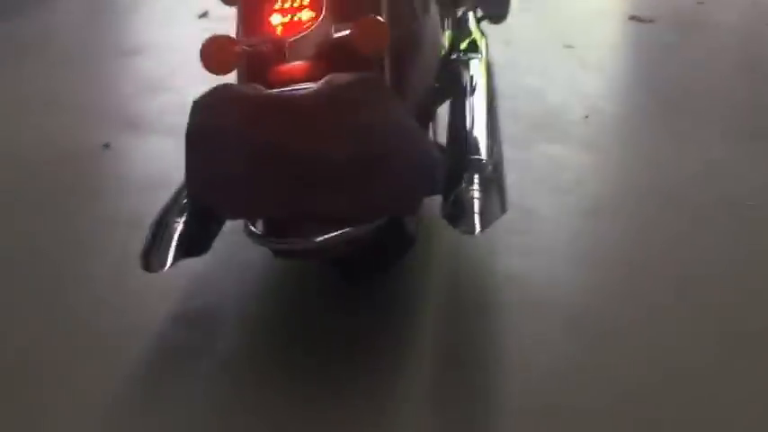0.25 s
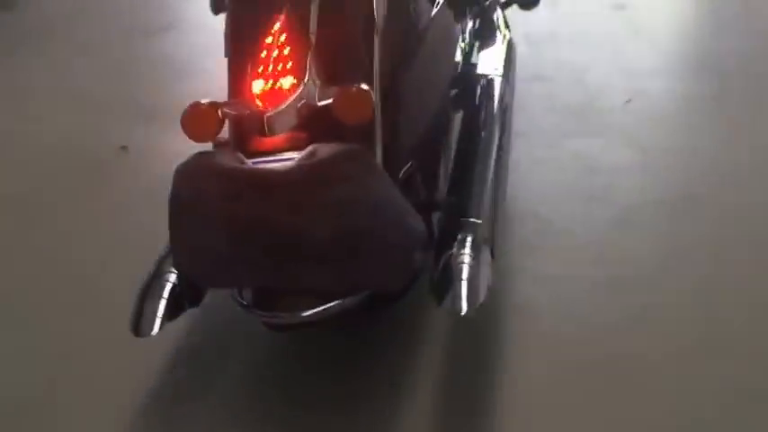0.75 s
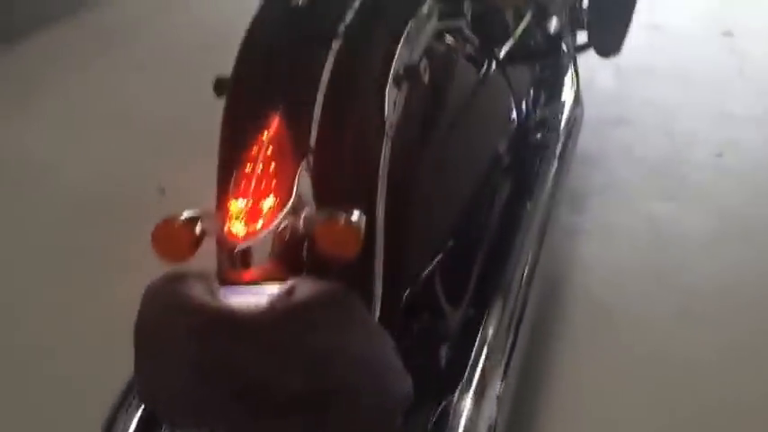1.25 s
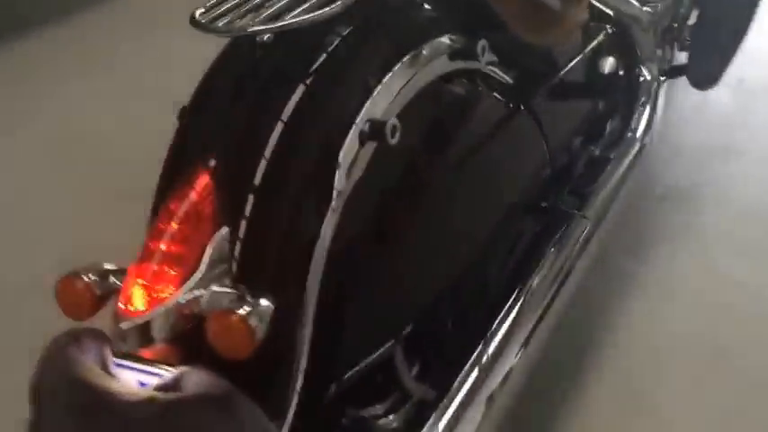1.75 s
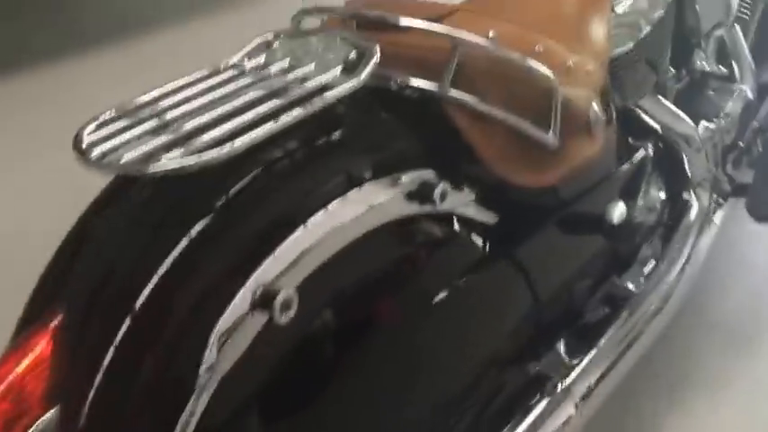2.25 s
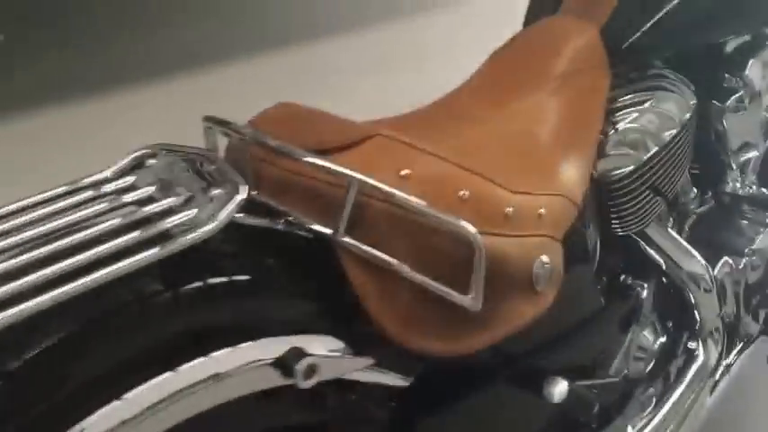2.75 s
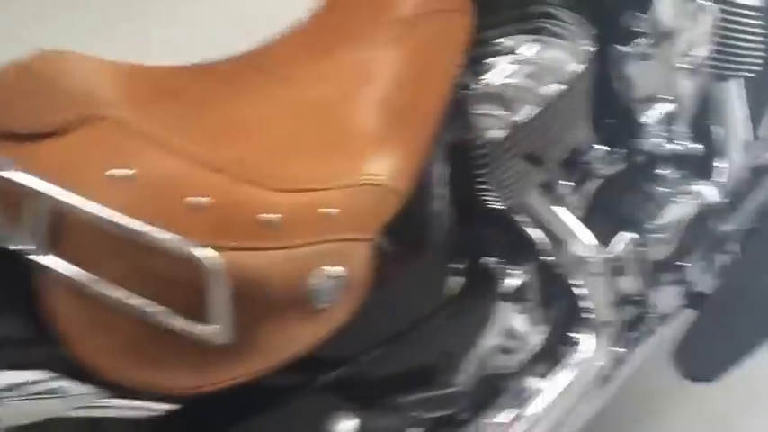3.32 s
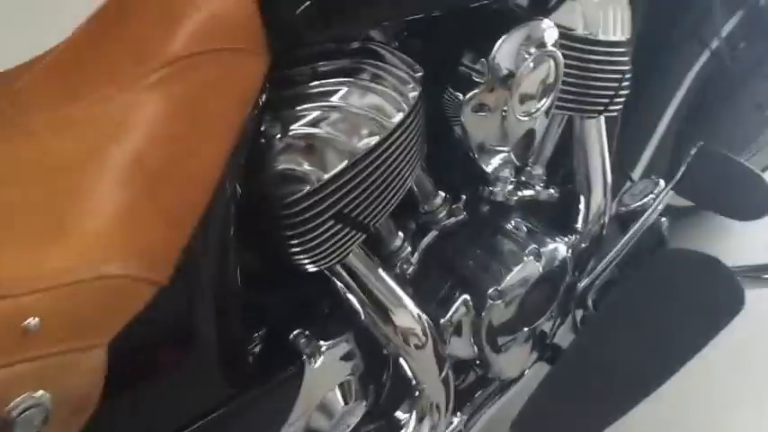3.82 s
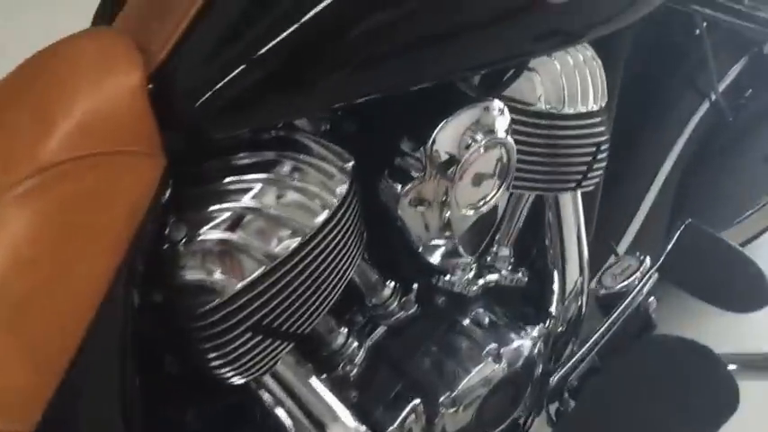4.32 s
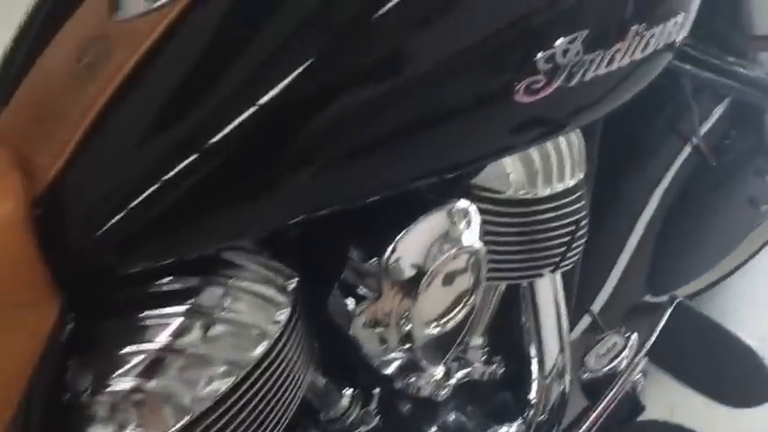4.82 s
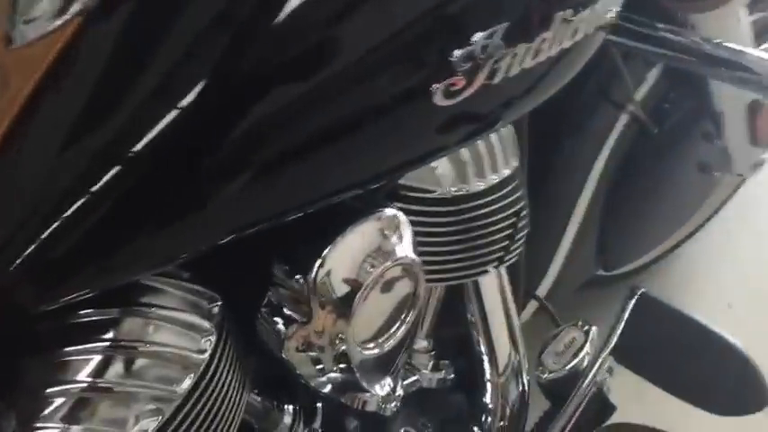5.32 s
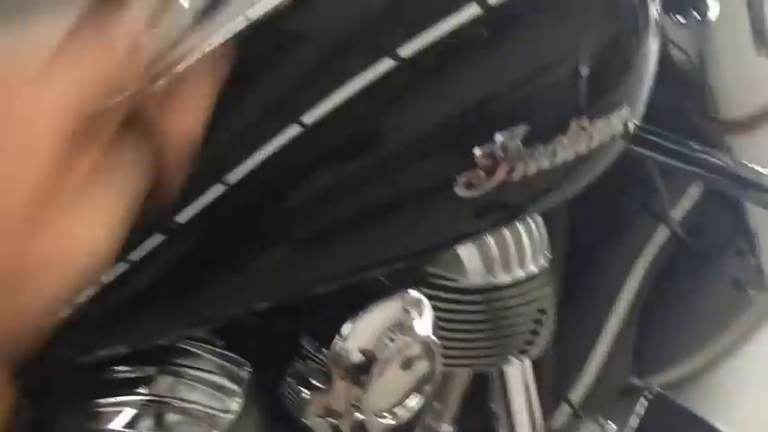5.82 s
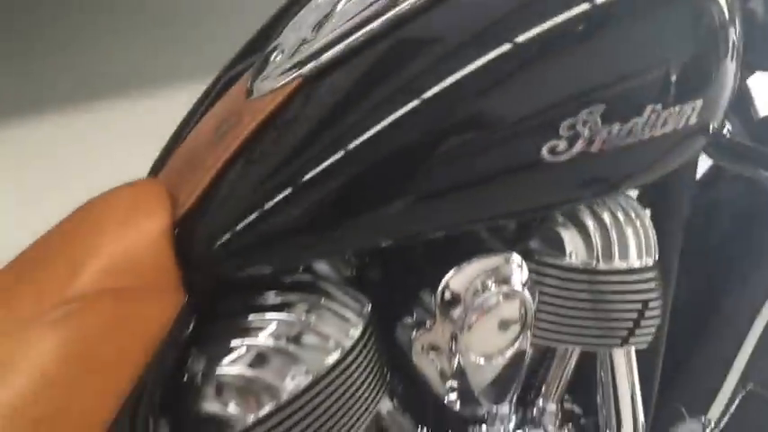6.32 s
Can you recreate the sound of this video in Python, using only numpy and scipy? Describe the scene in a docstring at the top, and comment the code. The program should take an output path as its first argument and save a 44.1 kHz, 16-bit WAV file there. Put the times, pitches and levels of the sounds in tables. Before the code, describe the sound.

A big twin-cylinder motorcycle idles with a slow, uneven, thumping exhaust beat indoors, then cuts off with last puffs and metallic clacks.

```python
"""V-twin idle and stop

A big V-twin motorcycle idles in a workshop, heard while walking from its tailpipes up to the cylinders.
Each cycle pairs a strong firing with a weak one that sometimes misses: gas pulses ring pipe and room modes,
short tones with rasp bark, and shaped noise and sines tick, knock and whirr as metal parts.
Then the ignition is cut: the engine pumps a few last puffs, clacks and rocks to rest."""
import sys
import numpy as np
from scipy.fft import rfft, irfft, next_fast_len
from scipy.io import wavfile

SR = 44100
rng = np.random.default_rng(int(sys.argv[2]) if len(sys.argv) > 2 else 0)


def output_pcm(signal):
    """Save a mono or channel-first signal as 16-bit PCM at the path in sys.argv[1].

    Samples are clipped to [-1, 1] before scaling.
    """
    pcm = np.clip(np.atleast_2d(signal).T, -1, 1) * 32767
    wavfile.write(sys.argv[1], SR, np.round(pcm).astype(np.int16))


N = 289727
SIZE = next_fast_len(N + 2 * SR)
HZ = np.maximum(np.arange(SIZE // 2 + 1) * SR / SIZE, 1e-3)
TIME = np.arange(N) / SR

# hollow ring of the pipes at the listener: (time [s], relative level [dB])
HOLLOW_RING = [(0.0, -36.5), (0.4, -29), (1.15, -26.5), (1.95, -29), (3.6, -37.5), (4.8, -29.5), (5.4, -27),
               (5.6, -29.5), (5.68, -30), (5.8, -28)]
# colour of the gears: (frequency [Hz], relative level [dB])
GEAR_COLOUR = [(150, -15), (330, 6.5), (470, -1.5), (700, 2), (1000, -7), (1400, 1), (2000, -6.5),
               (4000, -46)]

# usual thump of the leading and the trailing cylinder, as relative levels
LEAD_DB, TRAIL_DB = -1, -8.0
# below this a clack counts as bass, which only heavy blows stir
BASS_HZ = 523
# basic width of the rings of struck metal parts
RING_WIDTH_HZ = 70


def from_db(db):
    """Amplitude factor of a level in dB."""
    return 10 ** (np.asarray(db) / 20)


def rms_one(x):
    """Scales a signal to an rms of 1."""
    return x / np.sqrt(np.mean(x ** 2) + 1e-20)


def filtered(x, response):
    """Shapes a signal by a frequency response."""
    return irfft(rfft(x, SIZE) * response, SIZE)[:N]


def follow(points, times):
    """Values at these times along straight lines between (time, value) points."""
    return np.interp(times, *np.transpose(points))


def resonance(hz, width):
    """Response of a damped resonator, 1 on top."""
    return 1j * width * HZ / (hz ** 2 - HZ ** 2 + 1j * width * HZ)


def colour(points):
    """Response through (Hz, dB) points, falling away outside them."""
    hz, db = np.transpose(points)
    curve = from_db(np.interp(np.log(HZ), np.log(hz), db))
    low_fall = np.sqrt(1 + (hz[0] / HZ) ** 4)
    high_fall = np.sqrt(1 + (HZ / hz[-1]) ** 4)
    return curve / low_fall / high_fall


def noise(response, grain_db=0):
    """Noise of rms 1, made of tiny impacts; grain_db makes their sizes more uneven."""
    sizes = from_db(grain_db * np.minimum(rng.exponential(1, N), 5))
    return rms_one(filtered(rng.standard_normal(N) * sizes, response))


def chatter(response, per_s, spread_db):
    """Separate small impacts of uneven size that ring a body; rms 1."""
    sizes = from_db(spread_db * np.clip(rng.standard_normal(N), -2, 2))
    signs = rng.choice([-1, 1], N)
    struck = rng.random(N) < per_s / SR
    return rms_one(filtered(sizes * signs * struck, response))


def swell(start, rise, fade):
    """Envelope of height 1 that climbs for rise seconds and then dies away."""
    age = TIME - start
    live = slice(*np.searchsorted(age, [0, rise + 10 * fade]))
    out = np.zeros(N)
    climb = np.minimum(age[live] / rise, 1)
    out[live] = climb * np.exp(-np.maximum(age[live] - rise, 0) / fade)
    return out


def swells(times, levels_db, rise, fade):
    """Sum of equally shaped swells, each at its own level."""
    return sum(from_db(db) * swell(s, rise, fade) for s, db in zip(times, levels_db))


def near(times, tailpipes_db, cylinders_db):
    """Level in dB at these times, between its values at the two ends of the walk."""
    # the walk along the bike: (time [s], nearness [0 at the tailpipes, 1 at the cylinders])
    walk = [(0, 0), (1.2, 0.25), (2.1, 0.33), (2.7, 0.53), (3.5, 0.74), (4.5, 0.86), (5.6, 0.99)]
    return tailpipes_db + (cylinders_db - tailpipes_db) * follow(walk, times)


def at_firings(times, events):
    """Hands each event's values to the nearest firing; one row per column of the table after its time."""
    events = np.array(events)
    out = np.zeros((len(times), events.shape[1]))
    nearest = np.abs(times[:, None] - events[:, 0]).argmin(axis=0)
    out[nearest] = events
    return out.T[1:]


def idle():
    """Two firings a cycle, strong then weak: rows of (s, thump, low bark, high bark, tick, knock in dB)."""
    # the idle hunts around one cycle every 0.15 s: (time [s], engine cycles completed [count])
    crank = [(-0.0617, 0), (0.5444, 4), (0.8399, 6), (1.0, 7), (1.2883, 9), (1.5909, 11), (2.1863, 15),
             (2.9458, 20), (3.0903, 21), (3.3952, 23), (3.6887, 25), (3.9946, 27), (4.4437, 30),
             (4.5848, 31), (4.7375, 32), (5.0334, 34), (5.3396, 36), (5.7931, 39)]
    # trailing cylinder misfires or burns hard: (time [s], level against its usual strength [dB])
    odd_burns = [(.304, -27), (.908, -3.5), (1.062, 5.5), (1.205, -4.5), (1.353, -1), (1.502, -18),
                 (2.403, -15), (3.156, -1.5), (3.602, -16.5), (4.504, 2), (4.646, -8), (4.803, 6),
                 (5.098, -8), (5.253, 7.5)]
    # firings that crack out sharply:
    # (time [s], extra low bark [dB], extra high bark [dB], extra knock [dB])
    cracks = [(.545, 9.5, 4.5, 0), (.608, 13.5, 1, 3), (1.0, 0.5, 2.5, -2), (1.144, 1.5, -13, 0),
              (1.653, 5, 2, -1), (1.739, 8.5, 5, 5.5), (1.801, 6, 3, 0), (1.889, 6, 4.5, -2),
              (2.039, 6.5, 2, 5), (3.395, 10, -4, 2), (3.995, 7.5, -4, 1), (4.443, 4.5, -1, -1),
              (4.803, 10, -3, 1.5), (5.253, 4, 0, 3.5)]
    # the tailpipes beam their bark backwards, so it peaks as one passes their mouths:
    # (time [s], relative low bark [dB], relative high bark [dB])
    bark_walk = [(0, -41.5, -39), (.7, -47.5, -40.5), (1.3, -29.5, -35), (1.8, -39, -31), (2.4, -36, -40.5),
                 (3.0, -39, -42), (4.2, -38, -68), (5.7, -37, -45)]
    trail_share = .424  # the trailing cylinder fires this share of a cycle after the leading one
    thump_spread_db = 0.49
    bark_follows, tick_follows = .7, 0.71  # dB for each dB of thump

    crank_s, cycles = np.transpose(crank)
    cycle, trailing = np.divmod(np.arange(2 * int(cycles[-1])), 2)
    times = np.interp(cycle + trail_share * trailing, cycles, crank_s)
    odd_db, = at_firings(times, odd_burns)
    low_crack, high_crack, knock_crack = at_firings(times, cracks)

    thump = np.where(trailing, TRAIL_DB, LEAD_DB) + odd_db
    thump = thump + thump_spread_db * rng.standard_normal(len(times))
    force = thump - LEAD_DB
    bark_s, low_db, high_db = np.transpose(bark_walk)
    low = np.interp(times, bark_s, low_db) + bark_follows * force + low_crack
    high = np.interp(times, bark_s, high_db) + bark_follows * force + high_crack
    tick = near(times, tailpipes_db=-48.5, cylinders_db=-40) + tick_follows * force
    lead_knock = near(times, tailpipes_db=-48, cylinders_db=-40)
    trail_knock = near(times, tailpipes_db=-49.5, cylinders_db=-30.5)
    knock = np.where(trailing, trail_knock, lead_knock) + knock_crack
    return np.column_stack([times, thump, low, high, tick, knock])


def thumps(firings):
    """Each gas pulse rings the pipes and echoes off ceiling and walls; scattered sound rumbles after it."""
    # strokes without combustion as the engine runs down: (time [s], relative thump [dB])
    puffs = [(5.816, -9), (5.8588, -7.5), (5.9369, -3), (5.9796, -8.5), (6.0565, -9), (6.0937, -6)]
    # low resonances of pipes and room: (frequency [Hz], width [Hz], signed weight [ratio])
    boom_modes = [(53.93, 19.2, -19.25), (57.04, 21.01, 20.91), (102.22, 1.72, 3.41),
                  (109.98, 11.22, -7.95), (151.86, 6.69, 1.1), (193.62, 23.62, .48), (251.63, 11.9, -.24)]
    # ceiling and wall echoes of the thump: (delay [s], signed gain [ratio])
    echoes = [(.01962, .17), (.03736, .45), (.0487, .18), (.0729, -.13), (.0975, .14), (.1245, -.07)]
    # colour of the scattered sound: (frequency [Hz], relative level [dB])
    rumble_colour = [(20, -32), (35, -14), (50, -8.5), (120, 3), (140, -8.5), (168, -7.5), (184, -5),
                     (205, -12), (245, -14), (285, -21.5), (380, -25.5), (460, -36.5), (900, -27.5)]

    times, level_db = np.vstack([firings[:, :2], puffs]).T
    pulses = np.zeros(SIZE)
    # a firing before time 0 wraps to the buffer's end, and its ring wraps back into the start
    pulses[np.round(times * SR).astype(int)] = from_db(level_db + 34.5)
    pipes = sum(weight * resonance(hz, width) for hz, width, weight in boom_modes)
    walls = 1 + sum(gain * np.exp(-2j * np.pi * HZ * lag) for lag, gain in echoes)
    # doubled dB under a root: overlapping scatter adds up in power
    scatter = np.sqrt(swells(times, 2 * level_db, rise=0.0028, fade=0.14))
    rumble = from_db(-24) * noise(colour(rumble_colour))
    # the hollow note of the room swells and fades as one walks through it
    hollow_level = from_db(follow(HOLLOW_RING, TIME) - 4.5)
    hollow = hollow_level * noise(resonance(hz=182, width=13.5) ** 2)
    return filtered(pulses, pipes * walls) + scatter * (rumble + hollow)


def on_the_walk(boom):
    """The thumps as they reach the listener: their deepest part thins out away from the tailpipes."""
    deep = filtered(boom, 1 / (1 + (HZ / 77) ** 6))
    deep_gain = from_db(near(TIME, tailpipes_db=0.0, cylinders_db=-2))
    return boom + (deep_gain - 1) * deep


def overtone(firings, low_hz=168, high_hz=255, peak_s=.114):
    """A hollow pipe overtone glides up and back after each leading firing, to a new height each time."""
    lead = firings[::2, 0]
    cycle = np.maximum(np.searchsorted(lead, TIME) - 1, 0)
    # reach is a share of the way from low_hz to high_hz, and may overshoot
    reach, luck_db = rng.uniform([.3, -3], [1.2, 3], (len(lead), 2)).T
    glide = np.exp(-((TIME - lead[cycle] - peak_s) / .04) ** 2)
    hz = low_hz + (high_hz - low_hz) * reach[cycle] * glide
    level_db = luck_db + follow(HOLLOW_RING, lead)
    level = swells(lead + 0.043, level_db, rise=0.077, fade=.022)
    return from_db(2.5) * level * np.sin(2 * np.pi * np.cumsum(hz) / SR)


def bark(times, levels_db, hz, length, peak_s, rasp_db):
    """The exhaust valve cracks open: a gas jet sounds one pipe mode for a few cycles, with rasp around it."""
    pipe_spread = .035  # relative spread of the mode's pitch from firing to firing
    out = np.zeros(N)
    rasp = from_db(rasp_db) * noise(resonance(hz, 0.72 * hz) ** 2)
    luck = rng.standard_normal((len(times), 2))
    for s, db, (detune, turn) in zip(times, levels_db, luck):
        span = slice(*np.searchsorted(TIME, [s - .02, s + .03]))
        age = TIME[span] - s - peak_s
        tone = np.sin(2 * np.pi * (hz * (1 + pipe_spread * detune) * age + turn))
        out[span] += from_db(db) * np.exp(-(age / length) ** 2) * (tone + rasp[span])
    return out


def barks(firings):
    """Three bright tailpipe modes, about octaves apart; gas heat moves them a little at each firing."""
    times, _, low_db, high_db, _, _ = firings.T
    grunt = bark(times, low_db - 2.5, hz=340, length=0.0046, peak_s=0.00895, rasp_db=-4.5)
    low = bark(times, low_db + 1, hz=649, length=0.0061, peak_s=0.003635, rasp_db=-4.5)
    high = bark(times, high_db + 5, hz=1263, length=0.0033, peak_s=0.00272, rasp_db=-7.5)
    return grunt + low + high


def valve_gear(firings, metal):
    """Valves lift and seat around each firing and ring their covers; then the tappets knock."""
    # colour of lifting and seating valves: (frequency [Hz], relative level [dB])
    tick_colour = [(1000, -18), (2500, -0.5), (4200, 7), (5000, 4.5), (6400, 7.5), (7600, 5.5), (9600, 2),
                   (10400, 1), (11500, 5), (16000, 6.5)]
    # colour of the tappets: (frequency [Hz], relative level [dB])
    knock_colour = [(600, -9.5), (1200, 7), (2000, 0.5), (2750, 1.5), (3050, -2.5), (3450, 3.5), (4000, -2),
                    (4900, -18.5), (5600, -3), (7500, -14), (9000, -14.5), (10400, -29), (16000, -25)]
    # what the valve covers ring with: (frequency [Hz], relative level [dB])
    cover_modes = [(3400, -15), (3980, -12), (4670, -3.5), (6200, -24), (8400, -7.5), (9050, -5)]

    times, _, _, _, tick_db, knock_db = firings.T
    # nearer the cylinders, the ticks arrive further ahead of the thump from the tailpipes
    lifts = times - np.interp(times, [1.5, 4.5], [.0045, .008])
    lift = swells(lifts + .001, tick_db, rise=.003, fade=.012)
    seat = swells(times + 0.0055, tick_db - 4.5, rise=0.00076, fade=0.0026)
    ticks = from_db(3.0) * (lift + seat) * noise(colour(tick_colour) * metal, grain_db=1.0)

    covers = np.zeros(N)
    for hz, db in cover_modes:
        # every stroke favours other modes of the covers
        favour_db = np.clip(rng.normal(0, 7.7, len(times)), -12, 7)
        struck = swells(lifts + 0.0053, tick_db + db + favour_db, rise=0.0018, fade=0.011)
        covers += struck * np.sin(2 * np.pi * hz * TIME)

    knock = swells(times + 0.005, knock_db, rise=0.0085, fade=0.013)
    knocks = knock * noise(colour(knock_colour) * metal, grain_db=1.0)
    return ticks + from_db(-6.5) * covers + knocks


def machinery(firings, metal):
    """Gears whirr, chain and rockers chatter, louder as one nears; both sag as a piston compresses."""
    # colour of chain and rockers: (frequency [Hz], relative level [dB])
    clatter_colour = [(900, -20), (1800, 3.5), (2700, 1), (3050, -4.5), (3700, -5), (5000, -10.5),
                      (5700, -11), (6800, -12), (7800, -17.5), (9600, -14.5), (10400, -22), (11500, -17.5),
                      (16000, -22)]
    # the running noise sinks as the crank slows after the ignition is cut: (time [s], level [dB])
    run_down = [(6.02, 1), (6.18, -1), (6.31, -7), (6.57, -16)]

    times = firings[:, 0]
    # the dip starts 23 ms ahead of each firing
    sag_db = -2.5 * swells(times - .023, np.zeros(len(times)), rise=0.013, fade=0.0043)
    whirr_db = near(TIME, tailpipes_db=-47, cylinders_db=-39.5)
    whirr = from_db(whirr_db) * chatter(colour(GEAR_COLOUR) * metal, per_s=800, spread_db=-1.0)
    clatter_db = near(TIME, tailpipes_db=-52, cylinders_db=-43.5)
    clatter = from_db(clatter_db) * chatter(colour(clatter_colour) * metal, per_s=2600, spread_db=1.5)
    return from_db(follow(run_down, TIME) + sag_db) * (whirr + clatter)


def pings():
    """A valve now and then seats hard: narrow noise makes its cover ring out briefly above the ticking."""
    # hard seatings: (time [s], frequency [Hz], relative level [dB])
    seatings = [(1.742, 4000, -38), (3.397, 4050, -34.5), (3.539, 6200, -42), (3.684, 6570, -36.5),
                (3.992, 4600, -36), (4.144, 4005, -36.5), (4.886, 5640, -37)]
    out = np.zeros(N)
    for s, hz, db in seatings:
        ring = noise(resonance(hz, 3 * RING_WIDTH_HZ) ** 2)
        out += from_db(db - 1) * swell(s, rise=.002, fade=.010) * ring
    return out


def gulps():
    """Unfired pistons push air slowly: the deepest pipe resonance sounds as a sine, lower at every turn."""
    # slow gulps of air in the last turns: (time [s], level [dB], fade [s], frequency [Hz])
    last_turns = [(5.799, -21, 0.078, 56), (5.935, -25, 0.027, 52), (6.071, -9.5, 0.04, 50.4),
                  (6.175, -16, 0.081, 46.9)]
    out = np.zeros(N)
    for s, db, length, hz in last_turns:
        out += from_db(db) * swell(s, rise=0.013, fade=length) * np.sin(2 * np.pi * hz * (TIME - s))
    return out


def clacks(metal):
    """The crank kicks back against compression, takes up the play in the gears and leaves the case ringing."""
    # metal clacks as the crank stops:
    # (time [s], relative level [dB], relative bass [dB], relative treble [dB], crunch fade [s])
    blows = [(5.898, -29.5, -11, -10, 0.03), (5.934, -22.5, 3, 3.5, 0.0078), (6.05, -25.5, -7, 3.5, 0.0093),
             (6.058, -21.5, 3.5, -1, 0.01), (6.249, -25.5, -28, -27, 0.013), (6.325, -38, -8, -16, 0.04),
             (6.37, -23, -2, -12.5, 0.015), (6.429, -19.5, -15, -13, 0.012), (6.461, -29, 5, -15, 0.22)]
    # colour of the clack's body: (frequency [Hz], relative level [dB])
    body_colour = [(150, -8), (280, 20), (430, 10.5), (520, 3.5), (1100, 4.5), (2000, 6.5), (3000, -1.5),
                   (4500, -4.5), (6500, -7), (9000, -23), (16000, -42)]
    # colour of its treble: (frequency [Hz], relative level [dB])
    top_colour = [(2000, 3), (4500, 9.5), (8000, 0.5), (9600, 6.5), (10400, -2.5), (12000, 0), (16000, -5)]
    # what the crankcase rings with when struck: (frequency [Hz], relative level [dB], t60 [s])
    case_modes = [(253.6, 4, 0.27), (400, 1.5, 0.33), (695, 3.5, 0.095), (1186, 1, 0.063), (1700, -6, 0.23),
                  (2020, 2, 0.12), (2240, -1, 0.2), (3440, -1.5, 0.053), (4540, -16, .07),
                  (9700, -24, 0.068)]

    body = noise(colour(body_colour) * metal)
    top = noise(colour(top_colour) * metal)
    bass = filtered(body, 1 / (1 + (HZ / BASS_HZ) ** 6))
    crunch = np.zeros(N)
    for s, db, bass_db, treble_db, fade in blows:
        mix = body - bass + from_db(bass_db - 7) * bass + from_db(treble_db - 3.0) * top
        crunch += from_db(db) * swell(s, 0.0021, fade) * mix

    times, level_db, weight_db, _, _ = np.transpose(blows)
    ring = np.zeros(N)
    for hz, db, t60 in case_modes:
        # the bass level of a blow also sets how far it stirs the low modes
        heavy_db = (hz < BASS_HZ) * (weight_db + 4)
        struck_db = level_db + db + heavy_db + rng.normal(0, 4, len(times))
        struck = swells(times, struck_db, rise=0.0072, fade=t60 / np.log(1000))
        ring += struck * noise(resonance(hz, RING_WIDTH_HZ) ** 2)
    return crunch + from_db(-18) * ring


def rattle(metal):
    """Loose gear teeth tumble against each other as the crank rocks back for the last time."""
    teeth = chatter(colour(GEAR_COLOUR) * metal, per_s=470, spread_db=3)
    return from_db(-39) * swell(6.45, rise=0.027, fade=0.021) * teeth


def workshop(x):
    """A diffuse tail from the hard floor and walls, duller than the direct sound."""
    t60_s = 0.36
    tail = rng.standard_normal(N) * from_db(-60 * TIME / t60_s) * (TIME > .008)
    dull = 1 / (1 + 1j * HZ / 7000)
    return filtered(x, rfft(tail / np.linalg.norm(tail), SIZE) * dull)


def scene():
    """The idling engine and its last turns, with the room's tail on the sharp sounds."""
    # resonances of cases, covers and fins: (frequency [Hz], width [Hz], level [dB])
    metal_modes = [(719, 140, -1.5), (1287, 73, -1.5), (1830, 18, -21), (2180, 13, 7.5), (2400, 30, -7),
                   (2737, 23, 2.5), (3320, 430, -1.5), (3714, 32, 4.5), (3964, 83, 1.5), (4310, 28, 2.5),
                   (4590, 14, 0), (5370, 110, 1), (6150, 390, -5.5), (8540, 120, -9), (9370, 59, -4),
                   (14600, 320, -7.5)]
    firings = idle()
    metal = 1 + sum(from_db(db) * resonance(hz, width) for hz, width, db in metal_modes)
    exhaust = on_the_walk(thumps(firings)) + overtone(firings) + gulps()
    hits = barks(firings) + valve_gear(firings, metal) + pings() + clacks(metal) + rattle(metal)
    room = from_db(-6.5) * workshop(hits)
    return (exhaust + machinery(firings, metal) + hits + room)[None]


def record(dry):
    """The top is cut steeply."""
    cutoff_hz = 15850
    return filtered(dry[0], 1 / np.sqrt(1 + (HZ / cutoff_hz) ** 200))[None]


dry = scene()
out = record(dry)
output_pcm(out)
```